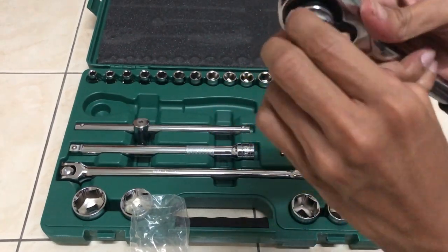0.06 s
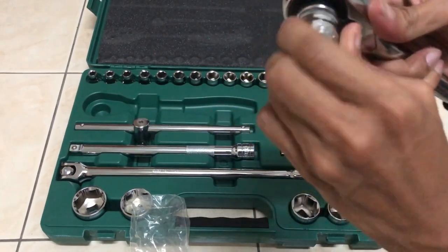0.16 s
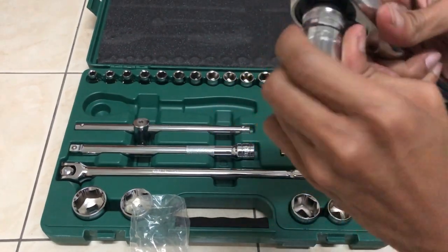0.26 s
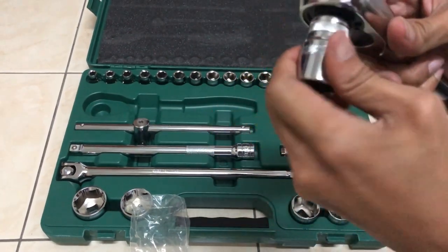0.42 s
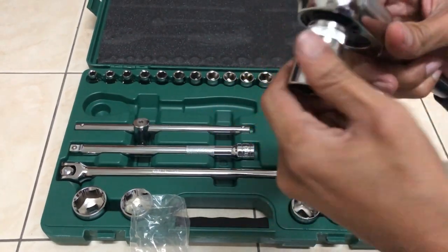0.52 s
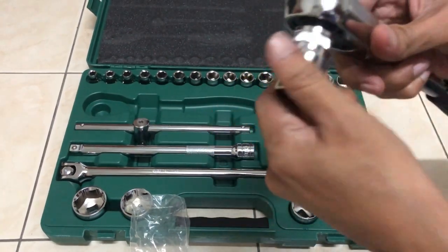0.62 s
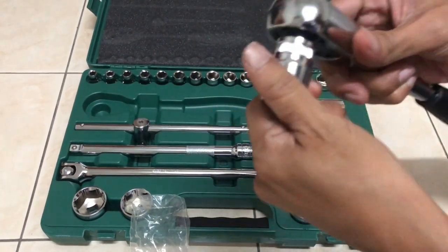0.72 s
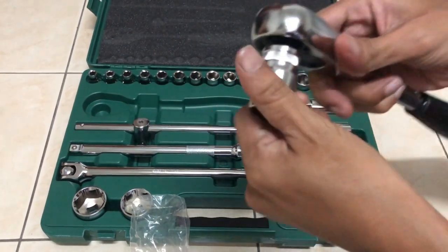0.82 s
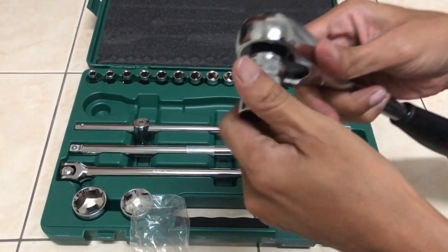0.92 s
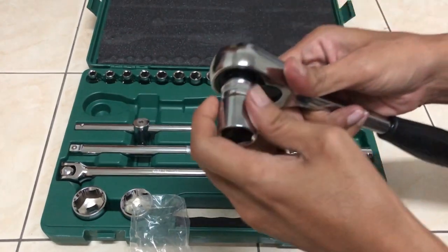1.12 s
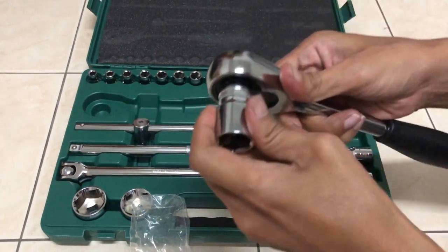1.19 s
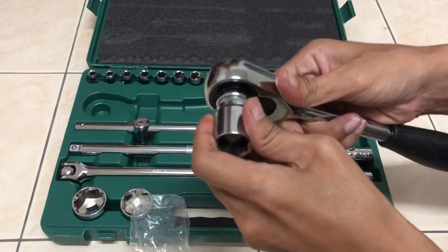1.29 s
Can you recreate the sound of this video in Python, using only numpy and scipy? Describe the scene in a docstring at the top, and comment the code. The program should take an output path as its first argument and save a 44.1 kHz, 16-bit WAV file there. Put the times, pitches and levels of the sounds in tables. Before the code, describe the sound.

A steel socket snaps onto a ratchet, heard close in a small, hard tiled room. After quiet rumble and faint hiss, light metal knocks begin around 0.2 s, with a loud, bright crack at 0.25 s and a faint ring. From 0.36 to 0.8 s, crisp ratchet ticks run fast, mostly in pairs. Soft taps follow at 0.93 and 1.3 s, with barely audible finger brushes between.

```python
"""Socket snapping onto a ratchet

A steel socket is wiggled on the square drive and snaps home with a bright crack, leaving a faint ring.
Twisted by hand, it makes the pawl tick over the teeth, mostly in pairs; soft knocks and brushes follow.
Contacts are shaped noise bursts, most with damped sines, answered by the noise tail of a small tiled room.
Underneath lie a low noise rumble, faint hiss and a weak sine hum."""
import sys
import numpy as np
from scipy import signal
from scipy.fft import rfft, irfft, next_fast_len
from scipy.io import wavfile
from scipy.ndimage import uniform_filter1d

SR = 44100
rng = np.random.default_rng(int(sys.argv[2]) if len(sys.argv) > 2 else 0)


def waveform_to_disk(signal):
    """Save audio, clipped to [-1, 1], as 16-bit WAV at the path in sys.argv[1]."""
    frames = np.transpose(np.atleast_2d(signal))
    scaled = np.clip(frames, -1, 1) * 32767
    samples = np.round(scaled).astype(np.int16)
    wavfile.write(sys.argv[1], SR, samples)


N = 59535  # length in samples


def amp(db):
    """Decibels to gain."""
    return 10 ** (np.asarray(db) / 20)


def unit(x):
    """Scale to rms 1."""
    return x / np.sqrt(np.mean(x ** 2) + 1e-20)


def along(points, hz):
    """Read (f/Hz, value) points on a log frequency axis."""
    point_hz, values = np.transpose(points)
    return np.interp(np.log(hz + 1), np.log(point_hz + 1), values)


def filtered(x, response):
    """Multiply the spectrum of x by a function of frequency."""
    size = next_fast_len(len(x) + SR // 4)
    hz = np.fft.rfftfreq(size, 1 / SR)
    return irfft(rfft(x, size) * response(hz), size)[:len(x)]


def causal(gain):
    """Minimum-phase response with the given gains: no energy smears ahead of the hit."""
    cepstrum = irfft(np.log(np.maximum(gain, 1e-6)))
    half = len(cepstrum) // 2
    cepstrum[1:half] *= 2
    cepstrum[half + 1:] = 0
    return np.exp(rfft(cepstrum))


def add(track, s, x):
    """Mix x into the track at time s."""
    part = track[max(round(s * SR), 0):][:len(x)]
    part += x[:len(part)]


# rumble and hiss, relative spectral density: f/Hz, level/dB (per Hz)
FLOOR_COLOUR = [(12, -23.5), (20, 1), (74, -11), (93, -16.5), (216, -32.5), (248, -33), (410, -33),
                (459, -36), (542, -32.5), (607, -38), (1220, -41.5), (1480, -46), (7310, -52.5),
                (16000, -57)]
FLOOR_DB, HISS_TOP_HZ = -47, 15900
HUM_HZ, HUM_DB = 242, -75.5


def background():
    """Noise coloured into low room rumble and faint hiss, plus a weak steady sine hum."""
    t = np.arange(N) / SR
    noise = rng.standard_normal(N)
    rumble = unit(filtered(noise, lambda hz: amp(along(FLOOR_COLOUR, hz)) * (hz < HISS_TOP_HZ)))
    hum = unit(np.sin(2 * np.pi * HUM_HZ * t))
    return amp(FLOOR_DB) * rumble + amp(HUM_DB) * hum


# decay of the room tail: f/Hz, t60/s
ROOM_DECAY = [(300, 0.2665), (1300, .26), (3500, 0.24), (8000, 0.36), (12000, .22), (16000, 0.16)]
# colour of the room tail: f/Hz, level/dB (before the wet level)
ROOM_TONE = [(300, -3), (1300, -8), (3000, -8), (7500, -12), (12000, -9), (14000, -15.5), (16000, -15)]
ROOM_DELAY_S, ROOM_RISE_S = 0.0049, 0.0045


def in_room(x, wet_db):
    """The tiled room answers with a diffuse noise tail whose decay time depends on pitch."""
    hz, t, bands = signal.stft(rng.standard_normal(SR // 2), SR, nperseg=256)
    decay = amp(-60 * t / along(ROOM_DECAY, hz)[:, None])
    tail = signal.istft(bands * decay, SR, nperseg=256)[1]
    tail_t = np.arange(len(tail)) / SR
    tail *= np.clip((tail_t - ROOM_DELAY_S) / ROOM_RISE_S, 0, 1)
    tail = filtered(tail / np.linalg.norm(tail), lambda f: amp(along(ROOM_TONE, f)))
    return x + amp(wet_db) * signal.fftconvolve(x, tail)[:len(x)]


# fingers brushing the tool: t/s, length/s, level/dB (rms before the fade in and out)
FINGER_BRUSHES = [(1.101, 0.056, -71), (1.233, 0.053, -73.5)]
BRUSH_HZ = 750  # centre of the rub


def fingers():
    """Skin slides softly over the steel as the grip changes: band-passed noise swelling and fading."""
    out = np.zeros(N)
    for s, length, db in FINGER_BRUSHES:
        size = int(length * SR)
        noise = rng.standard_normal(size)
        rub = unit(filtered(noise, lambda hz: hz ** 2 / (BRUSH_HZ ** 4 + hz ** 4) * BRUSH_HZ ** 2))
        add(out, s, amp(db) * np.hanning(size) * rub)
    return out


def ring(modes, scatter_db, detune, size=16384):
    """Struck steel rings as damped sines, with random polarity and scattered level and pitch."""
    t = np.arange(size) / SR
    out = np.zeros(size)
    for hz, db, t60 in modes:
        polarity = rng.choice([-1, 1])
        envelope = amp(db + scatter_db * rng.normal() - 60 * t / t60)
        pitch = hz * (1 + detune * rng.normal())
        out += polarity * envelope * np.sin(2 * np.pi * pitch * t)
    return out


CRACK_DB, CRACK_T60_S = -6, 0.0017  # first instant of a contact
EVEN_HZ = 900  # a contact holds all pitches: its spectrum is evened over this width


def burst(colour, hold_s, t60, size=16384):
    """A crack and a dense metallic burst damped by the hands; colour gives dB for each frequency."""
    t, hz = np.arange(size) / SR, np.fft.rfftfreq(size, 1 / SR)
    body = amp(-60 * np.maximum(t - hold_s, 0) / t60)
    crack = amp(CRACK_DB - 60 * t / CRACK_T60_S)
    shape = body + crack
    spectrum = rfft(shape * rng.choice([-1, 1], size))
    power = uniform_filter1d(np.abs(spectrum) ** 2, int(EVEN_HZ * size / SR))
    local = np.sqrt(np.abs(power))
    x = irfft(spectrum * causal(amp(colour(hz)) * local.mean() / local))
    # colour alters the tone but not the energy
    return x * np.linalg.norm(shape) / np.linalg.norm(x)


BODY_HZ, SHEEN_HZ = 4040, 9200  # body lies below, sheen above


def shade(hz, body_db, sheen_db):
    """Low and high shelves in dB: each contact lands a little differently."""
    body = body_db / (1 + (hz / BODY_HZ) ** 8)
    sheen = sheen_db / (1 + (SHEEN_HZ / (hz + 1)) ** 16)
    return body + sheen


# relative colour of a steel contact, shared with the taps: f/Hz, level/dB (per Hz)
STEEL_COLOUR = [(150, -33), (500, -21), (1000, -11.5), (1700, -7.5), (2300, -3.5), (3200, -4), (4100, -6.5),
                (5100, 2.5), (5800, -3), (6500, 3), (7800, 6.5), (10000, 1.5), (12400, 5), (13300, 0.5),
                (14100, 2), (15700, -13.5), (16300, -41.5)]
# modes of the ratchet head, before shading and head gain: f/Hz, level/dB, t60/s
HEAD_MODES = [(2150, -23, 0.0083), (2773, -18, .05), (3290, -24, 0.015), (5120, -11.5, 0.016),
              (6730, -20, 0.017), (7220, -8.5, 0.025), (8300, -19, 0.019), (8800, -21.5, .05),
              (10100, -22.5, .03), (10730, -24, 0.056), (11100, -10, 0.017), (13750, -16, 0.017)]
# modes of the socket, shared with the snap, before any gain: f/Hz, level/dB, t60/s
SOCKET_MODES = [(1380, -46.5, 0.58), (2200, -53, 0.18), (2736, -49, 0.28), (4950, -48.5, .16),
                (5370, -48.5, 0.17), (6425, -47.5, 0.14), (6900, -44, 0.19), (7330, -49, .17),
                (7360, -45, 0.21), (7950, -47.5, .17), (8940, -45, .17), (9530, -44.5, .14),
                (11040, -43, .2), (11400, -46, 0.13)]
SHIMMER_DB, SHIMMER_HZ = 15.5, 4013  # light contacts wake only the socket's modes above this


def contact(body_db, sheen_db, hold_s, t60, head_db):
    """Steel on steel: a burst, the modes of the ratchet head and a shimmer from the socket."""
    head = [(hz, db + shade(hz, body_db, sheen_db), life) for hz, db, life in HEAD_MODES]
    shimmer = [mode for mode in SOCKET_MODES if mode[0] > SHIMMER_HZ]
    click = burst(lambda hz: along(STEEL_COLOUR, hz) + shade(hz, body_db, sheen_db), hold_s, t60)
    click += amp(head_db) * ring(head, scatter_db=3.0, detune=0.011)
    return click + amp(SHIMMER_DB) * ring(shimmer, scatter_db=3, detune=0.0017)


# soft taps as the play is taken up: t/s, level/dB, dull above f/Hz, ping f/Hz, ping level/dB (in the tap)
SOFT_TAPS = [(0.9313, -40.5, 10520, 2680, -7.5), (0.9371, -50.5, 9000, 2700, -10),
             (1.2972, -48.5, 5350, 5290, -3)]


def taps():
    """Gentle contacts: steel bursts with the treble rolled off, each with one short ping."""
    out = np.zeros(N)
    for s, db, dull_hz, ping_hz, ping_db in SOFT_TAPS:
        def colour(hz):
            return along(STEEL_COLOUR, hz) - 20 * np.log10(1 + (hz / dull_hz) ** 8)
        tap = burst(colour, hold_s=0.00047, t60=0.012)
        tap += ring([(ping_hz, ping_db, .018)], scatter_db=1.5, detune=0)
        add(out, s, amp(db) * in_room(tap, wet_db=-3.5))
    return out


# pawl dropping into a tooth: t/s, level/dB (before the common gain), body level/dB, sheen level/dB
PAWL_TICKS = [(0.3591, -23.5, -1, -2), (0.368, -27.5, 1, -1), (0.4015, -23.5, -2.5, -5),
              (0.409, -28, 3, -2.5), (0.4248, -27.5, 0.5, -5.5), (0.4573, -24.5, -2.5, -8),
              (0.4666, -27.5, 2.5, 0), (0.4836, -27, 5.5, 4), (0.4986, -29.5, 2, -7), (0.5185, -28, 4, 2),
              (0.531, -28.5, 4.5, 0.5), (0.5489, -28, 2, -2), (0.5606, -25.5, 0.5, 1), (0.5802, -26, 1, -3),
              (0.5912, -24, 0, 0.5), (0.6204, -27, 5.5, -0.5), (0.6302, -27, -2, -3.5),
              (0.6614, -25.5, 3, -0.5), (0.67, -26.5, 1, -1), (0.6823, -24.5, 0, 1), (0.718, -25, 3, 0),
              (0.726, -25, -1, 0.5), (0.786, -26.5, 5, 2.5), (0.795, -25, -1, 2.5)]
PAWL_HOLD_S, PAWL_T60_S, PAWL_GAIN_DB = 0.00087, 0.017, 3


def pawl():
    """The pawl ticks over the teeth as the socket is twisted, one steel contact per tooth."""
    out = np.zeros(N)
    for s, db, body_db, sheen_db in PAWL_TICKS:
        tick = contact(body_db, sheen_db, PAWL_HOLD_S, PAWL_T60_S, head_db=-2)
        add(out, s, amp(db + PAWL_GAIN_DB) * in_room(tick, wet_db=-2))
    return out


# socket knocking on the drive: t/s, level/dB (before the common gain), body level/dB, sheen level/dB
SOCKET_KNOCKS = [(0.206, -52.5, -2.5, 0.5), (0.232, -26, -4.5, -1), (0.2339, -29, -6.5, 3),
                 (0.2382, -31, 0.5, 0), (.243, -25, 1, -3), (0.2502, -27.5, 4.5, -3.5),
                 (0.2613, -23.5, 0.5, -2.5), (0.2733, -23, -2.5, -3.5), (0.295, -25, 3, -0.5)]
SOCKET_HOLD_S, SOCKET_T60_S, SOCKET_GAIN_DB = .0007, .017, 3


def socket():
    """The wiggled socket knocks on the drive: steel contacts with less of the ratchet head."""
    out = np.zeros(N)
    for s, db, body_db, sheen_db in SOCKET_KNOCKS:
        knock = contact(body_db, sheen_db, SOCKET_HOLD_S, SOCKET_T60_S, head_db=-6.5)
        add(out, s, amp(db + SOCKET_GAIN_DB) * in_room(knock, wet_db=-1.5))
    return out


# the snap home and its rebound: t/s, level/dB, body level/dB, sheen level/dB, hold/s, t60/s
SNAP_BLOWS = [(0.2519, -5.5, -10.5, 10, 0.00067, .002), (.2537, -14.5, 3.5, -6.5, 0.0011, .016)]
# relative colour of the socket hitting home: f/Hz, level/dB (per Hz)
SNAP_TONE = [(200, -34), (800, -22), (1500, -16.5), (2400, 0), (4500, -5), (5600, 1.5), (6600, -5.5),
             (7800, 6.5), (9600, 4), (12800, 1), (14500, -17), (15800, -18.5), (16800, -40.5)]
# dull knock of the tool in the hand: f/Hz, level/dB, t60/s
THUD_MODES = [(280, -46, 0.037), (560, -37, .014), (1022, -27.5, 0.025)]


def snap():
    """The socket hits home and rebounds as two bursts; the tool thuds and the socket rings on."""
    out = np.zeros(N)
    for s, db, body_db, sheen_db, hold_s, t60 in SNAP_BLOWS:
        blow = burst(lambda hz: along(SNAP_TONE, hz) + shade(hz, body_db, sheen_db), hold_s, t60)
        add(out, s, amp(db) * in_room(blow, wet_db=-5))
    thud = ring(THUD_MODES, scatter_db=1, detune=.005)
    chime = ring(SOCKET_MODES, scatter_db=1, detune=0)
    home_s = SNAP_BLOWS[0][0]
    add(out, home_s, in_room(thud, wet_db=-8) + chime)
    return out


def scene():
    """All sources summed at one microphone."""
    return (background() + fingers() + taps() + pawl() + socket() + snap())[None]


TOP_HZ = 16700  # band limit


def record(dry):
    """The recorder softly rounds off high peaks and keeps nothing above its band limit."""
    rounded = dry[0] / (1 + np.abs(dry[0]) ** 6) ** (1 / 6)
    return filtered(rounded, lambda hz: hz < TOP_HZ)[None]


dry = scene()
out = record(dry)
waveform_to_disk(out)
```